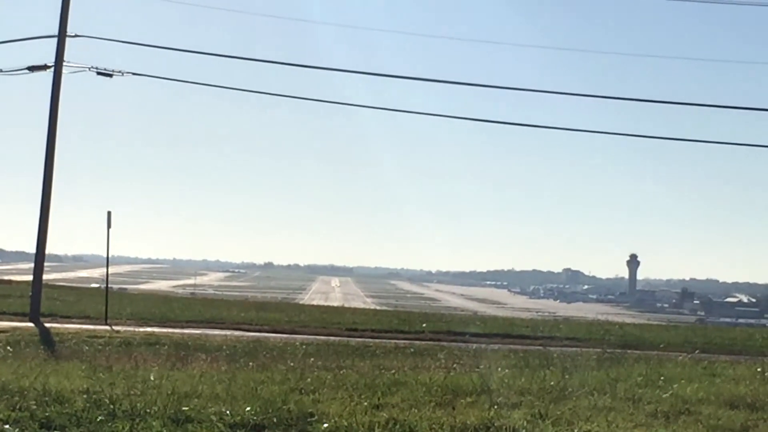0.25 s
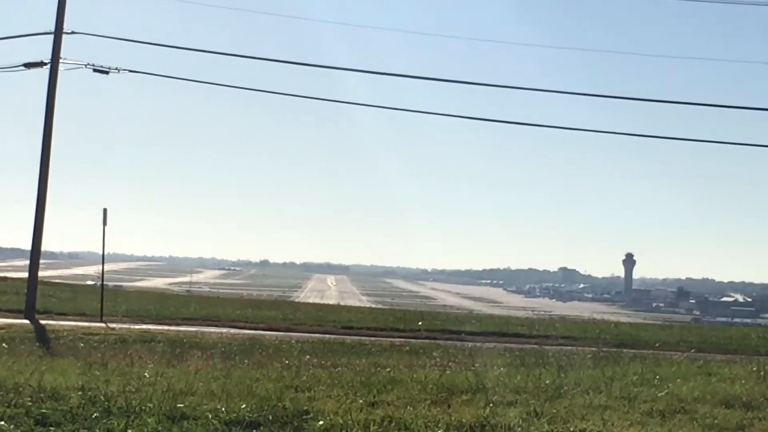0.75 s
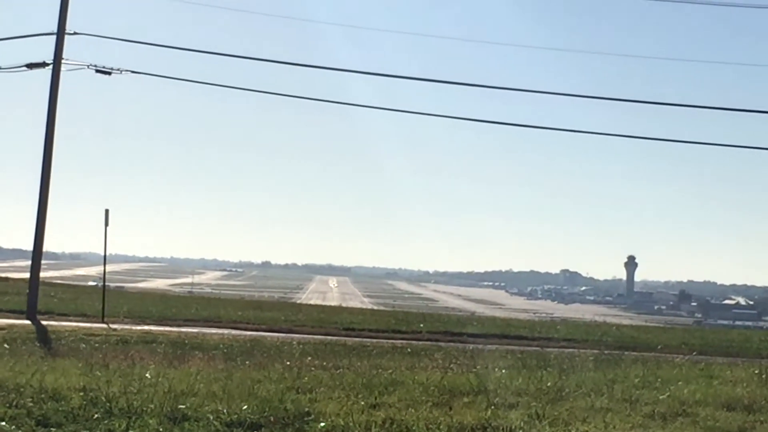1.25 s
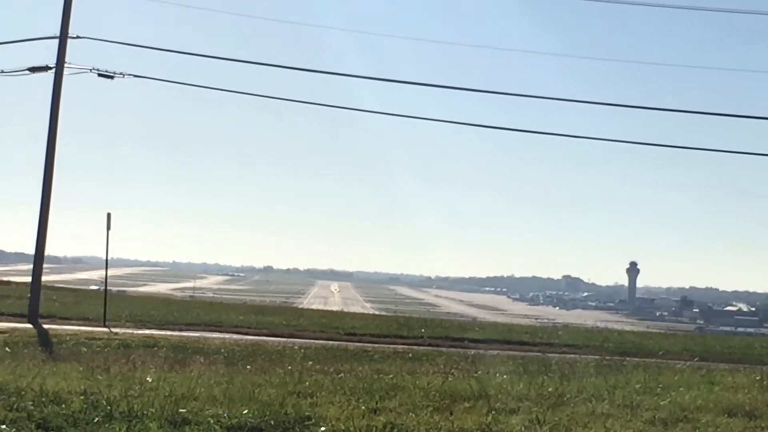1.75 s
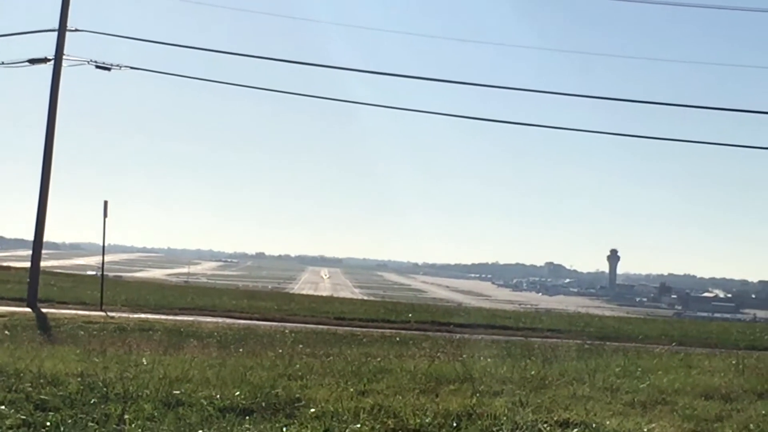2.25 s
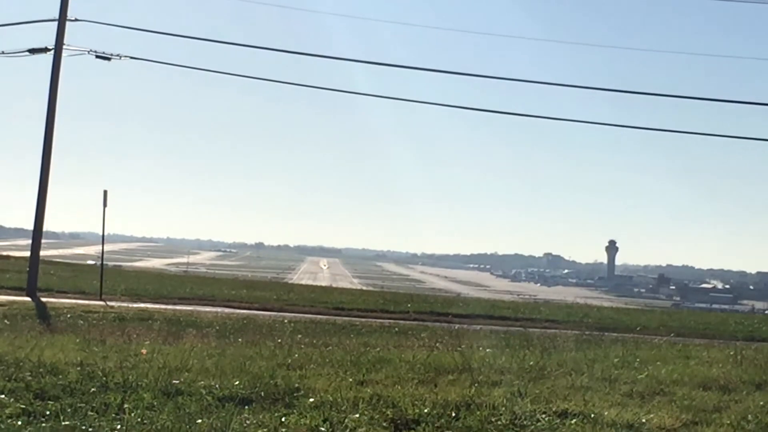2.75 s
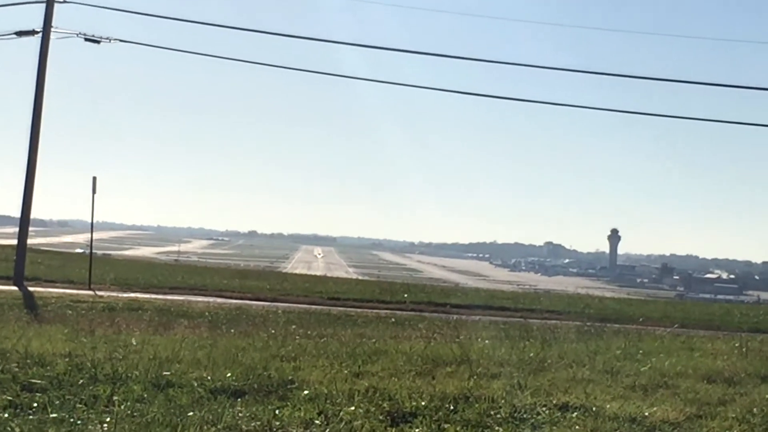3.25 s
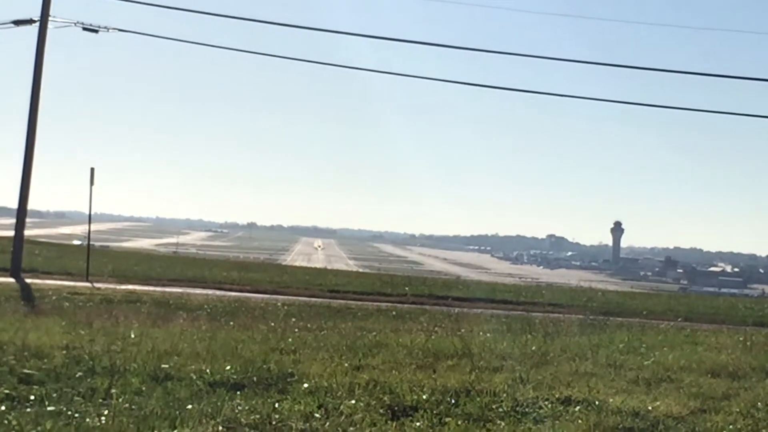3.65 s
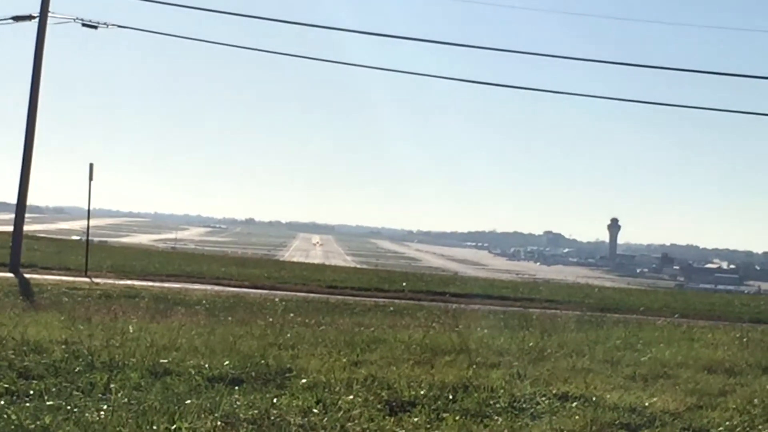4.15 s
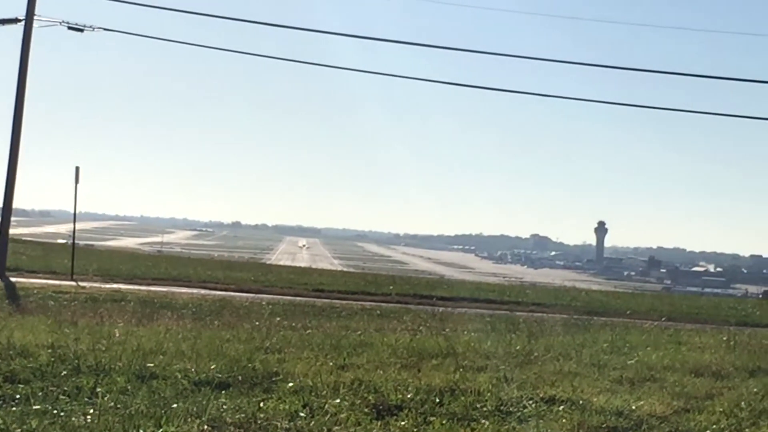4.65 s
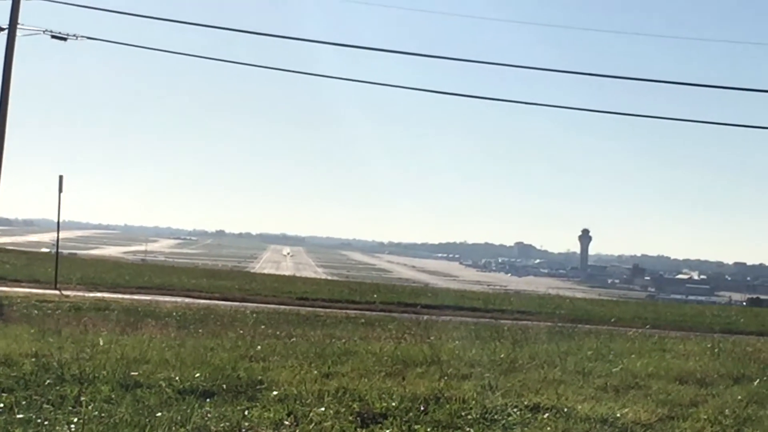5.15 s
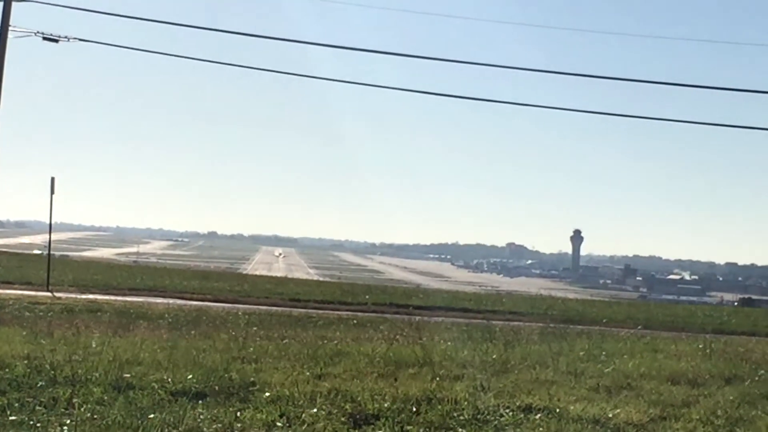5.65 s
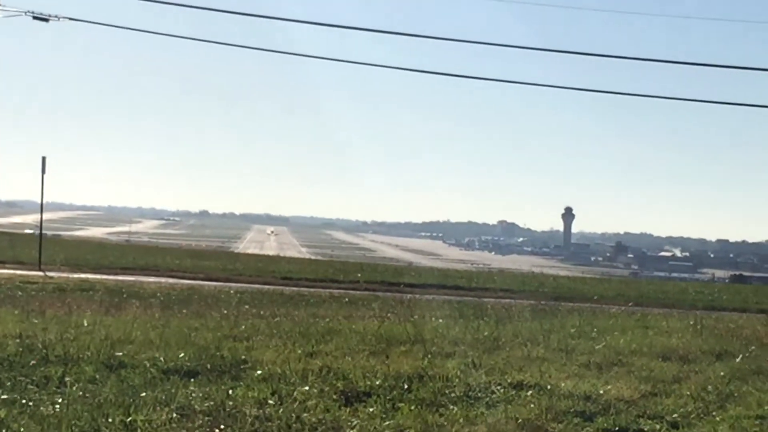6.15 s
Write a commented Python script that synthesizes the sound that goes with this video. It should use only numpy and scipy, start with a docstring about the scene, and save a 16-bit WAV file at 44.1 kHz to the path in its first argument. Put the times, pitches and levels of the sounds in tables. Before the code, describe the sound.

A distant jet airliner rumbles and roars steadily while crickets chirp in the grass and small birds call.

```python
"""A meadow beyond the runway, on the microphone of a hand-held camera, with a jet airliner far off.
From the start, its exhaust rumbles and roars at takeoff power under faint turbine whines, and crickets
scrape their wings in the grass. The camera ticks, mostly in the first 1.5 s, as small birds begin to
chip and pipe. The nearest cricket grows loudest around 3.5 s. From 4.7 s a songbird whistles one
phrase three times, while the roar goes on sinking slowly as the jet draws away."""
import sys
import numpy as np
from scipy import signal
from scipy.fft import rfft, irfft, next_fast_len
from scipy.io import wavfile
from scipy.ndimage import uniform_filter1d, map_coordinates

SR = 44100
rng = np.random.default_rng(int(sys.argv[2]) if len(sys.argv) > 2 else 0)


def wav_record(signal):
    """Record a signal, one row per channel, as 16-bit PCM in the file named by sys.argv[1]."""
    frames = np.transpose(np.atleast_2d(signal))
    bounded = np.clip(frames, -1, 1)
    # unit amplitude maps onto the largest positive 16-bit level
    quanta = np.round(bounded * 32767).astype(np.int16)
    wavfile.write(sys.argv[1], SR, quanta)


N = 282240

# spectra of the exhaust's rumble and roar at the microphone: f/Hz, relative level/dB
RUMBLE_SPECTRUM = [(20, -43), (32, -23.5), (48, -10), (65, -1.5), (86, -0.5), (120, -2.5), (150, -10.5),
                   (210, -15), (320, -24.5), (600, -53), (1500, -79)]
ROAR_SPECTRUM = [(100, -19), (250, -4), (350, 0.5), (440, -2.5), (560, 3), (700, 2), (950, -2.5),
                 (1200, -10), (1600, -18.5), (2200, -28), (3500, -50), (8000, -77)]
# the jet rumble's uneven, random rises and dips in loudness: t/s, level/dB
RUMBLE_LOUDNESS = [(0, -44.5), (.14, -35.5), (.24, -44.5), (.32, -37), (.53, -38), (.73, -43.5),
                   (.84, -42.5), (1.0, -40.5), (1.11, -45), (1.25, -42), (1.37, -40.5), (1.53, -43),
                   (1.74, -41), (2.05, -46), (2.2, -42), (2.56, -45), (2.74, -41.5), (2.85, -42.5),
                   (2.97, -38), (3.15, -46), (3.3, -42.5), (3.54, -41), (3.76, -41.5), (4.02, -43),
                   (4.26, -43), (4.42, -39.5), (4.58, -45), (4.8, -42.5), (5.09, -43.5), (5.24, -40.5),
                   (5.4, -42.5), (5.52, -42.5), (5.73, -44), (5.89, -38.3), (6.13, -42.5), (6.4, -42.5)]
# the roar's low band against the rest of the roar: t/s, level/dB
LOW_ROAR_SWELLS = [(0, 2), (.9, 1.5), (1.25, 3), (1.95, -1), (2.5, 2.5), (3.7, 0), (4.15, 1.5), (4.4, 6),
                   (5.1, -1), (5.85, -0.5), (6.4, -4.5)]
# the lower engine tone: t/s, level/dB
LOW_TONE_SWELLS = [(0, -60.5), (1.5, -70), (2.3, -72), (2.9, -58), (3.4, -66), (4.8, -75), (5.45, -54.5),
                   (5.8, -58), (6.05, -59), (6.4, -58)]
# the rising fan whine: t/s, f/Hz, level/dB
FAN_WHINE = [(0, 1298, -71.5), (2.4, 1389, -74.5), (3.35, 1432, -69.5), (3.8, 1480, -80.5),
             (6.4, 1658, -76)]

# short notes opening each songbird phrase:
# t/s, length/s, first f/Hz, middle f/Hz, last f/Hz, quaver/share of pitch, level/dB
OPENING_NOTES = [(4.74, 0.032, 4060, 4380, 4500, .035, -75.5),
                 (4.785, 0.034, 2890, 2980, 2950, 0.019, -61.5),
                 (4.837, 0.013, 3190, 3300, 3180, .03, -62.5), (4.879, 0.014, 2650, 2560, 2310, .012, -60),
                 (4.964, 0.025, 3640, 3800, 3600, .018, -63),
                 (5.214, 0.035, 4000, 4200, 4370, 0.047, -69.5),
                 (5.263, 0.042, 2890, 2936, 2940, 0.022, -63),
                 (5.312, 0.016, 3450, 3260, 3220, .035, -60.5),
                 (5.359, 0.014, 2800, 2550, 2200, .012, -59.5),
                 (5.438, 0.035, 3600, 3800, 3710, .018, -62.5),
                 (5.685, 0.0445, 4040, 4280, 4450, 0.027, -71.5),
                 (5.736, 0.085, 2940, 3020, 3080, .035, -69),
                 (5.777, 0.047, 3440, 3320, 3210, 0.041, -67.5),
                 (5.834, 0.018, 2750, 2500, 2150, .012, -63), (5.913, 0.042, 3600, 3754, 3660, 0.014, -62)]
# the falling whistle closing each phrase, one curve each: t/s, f/Hz, level/dB
CLOSING_SLURS = [
    [(5.003, 2920, -60), (5.013, 2830, -52), (5.039, 2654, -52.5), (5.075, 2610, -57), (5.091, 2580, -58),
     (5.097, 2540, -70), (5.105, 2550, -56), (5.114, 2490, -68)],
    [(5.482, 2870, -61), (5.492, 2850, -58), (5.503, 2790, -53), (5.519, 2635, -52.5), (5.545, 2630, -56),
     (5.563, 2540, -56), (5.573, 2480, -65), (5.58, 2500, -70)],
    [(5.959, 2900, -64), (5.968, 2785, -52.5), (5.987, 2670, -56), (6.012, 2653, -58), (6.026, 2608, -63),
     (6.048, 2530, -59), (6.059, 2470, -65)],
]
# soft piping of small birds: t/s, length/s, f/Hz, drop/share of pitch, level/dB
PIPING_NOTES = [(1.374, 0.025, 4270, 0.037, -70), (1.459, 0.024, 4300, .08, -65),
                (1.548, .026, 4270, .06, -68.5), (2.0, .016, 4600, .01, -84), (2.145, .016, 4620, .01, -83),
                (3.23, .016, 4560, .01, -83.5), (3.325, .016, 4560, .04, -81), (4.17, .018, 4630, .01, -79),
                (4.273, .021, 4290, .01, -72), (4.346, .021, 4300, .01, -68.5),
                (4.423, 0.03, 4300, 0.046, -66), (6.26, 0.025, 4640, .02, -75),
                (6.313, .022, 4650, .02, -70)]
# sharp alarm chips: t/s, starting f/Hz, level/dB
ALARM_CHIPS = [(0.212, 5050, -70), (.658, 5650, -73), (0.7748, 4530, -66.5), (2.844, 4700, -69.5),
               (4.258, 4330, -66.5), (5.322, 4600, -65.5), (6.366, 4470, -66)]
# birds further off, blurred by echoes: t/s, f/Hz, level/dB
FAR_BIRD_NOTES = [(0.86, 3590, -82.5), (0.907, 3010, -78), (0.925, 6250, -82), (1.047, 3640, -81.5),
                  (1.134, 2780, -81.5)]

# the cricket nearest the microphone: t/s, length/s, f/Hz, level/dB
NEAR_CRICKET = [(.198, 0.051, 8300, -75), (.428, .04, 8350, -75), (.657, 0.054, 8420, -71.5),
                (0.889, 0.053, 8380, -69.5), (1.132, 0.066, 8370, -69), (1.359, .056, 8400, -68.5),
                (1.592, 0.046, 8400, -68), (1.802, 0.056, 8400, -64.5), (2.06, 0.059, 8420, -65),
                (2.292, 0.057, 8470, -65.5), (2.55, .064, 8300, -66), (2.755, 0.067, 8360, -64),
                (3.025, 0.07, 8370, -63), (3.253, .064, 8330, -62), (3.455, 0.062, 8410, -59),
                (3.69, 0.074, 8370, -60.5), (3.923, 0.065, 8440, -61.5), (4.168, 0.06, 8420, -63.5),
                (4.395, 0.062, 8430, -64), (4.681, 0.059, 8400, -65.5), (4.902, 0.061, 8340, -62.5),
                (5.139, 0.066, 8380, -64)]
# a slower cricket further off: t/s, level/dB
SLOW_CRICKET = [(0, -71.5), (.282, -72), (.513, -71.5), (.749, -71), (1.021, -72), (1.292, -73),
                (1.54, -71), (1.814, -72), (2.075, -73), (2.33, -74), (2.591, -74), (2.855, -74.5),
                (3.095, -75), (3.325, -75), (3.555, -73), (3.82, -74), (4.075, -72), (4.301, -72.5),
                (4.53, -75.5), (4.753, -72.5), (5.008, -76), (5.265, -74.5), (5.528, -72.5), (5.778, -72),
                (6.047, -72.5), (6.274, -74.5)]
# choirs of distant crickets: f/Hz, level of one insect/dB
FAR_CHOIRS = [(6800, -84), (7180, -84), (7800, -85)]
# insect hiss across the meadow: f/Hz, relative level/dB
HISS_SPECTRUM = [(1200, -10.5), (2000, -4), (2900, -3.5), (4400, -5.5), (5000, -8.5), (6000, -6.5),
                 (6750, -4), (7600, -5.5), (8300, -5), (9100, -8.5), (10300, -15.5), (11500, -13.5),
                 (15200, -18)]
# ticks of the camera body, right at the microphone: t/s, level/dB, ring f/Hz
CAMERA_TICKS = [(0.414, -54, 4600), (0.4153, -50, 5800), (0.4157, -48, 1890), (0.4207, -36, 2015),
                (.4309, -51, 3600), (.4358, -47, 1870), (1.229, -54, 2410), (1.385, -51, 2290),
                (1.504, -56, 2620), (3.981, -59, 3300), (5.012, -53, 3960), (6.016, -52, 3900)]

WAVER_PER_S, WAVER_SHARE, WAVER_DB = 66, 0.0087, 2  # unsteadiness of a bird's pitch and loudness


def exhaust():
    """Big eddies rumble and small ones roar, uneven in loudness; distance has taken the treble."""
    rumble_db, = curves(RUMBLE_LOUDNESS)
    low_db, = curves(LOW_ROAR_SWELLS)
    roar_db = -49.5 - 0.35 * np.arange(N) / SR  # sinks as the jet draws away
    flutter = amp(1.03 * wobble(21.986))
    rumble = amp(rumble_db) * steadied(flutter * rush(RUMBLE_SPECTRUM, patchy_db=0.2))
    roar = amp(roar_db + 0.46 * wobble(9)) * steadied(rush(ROAR_SPECTRUM, patchy_db=2.13))
    low_band = filtered(roar, lambda hz: np.exp(-((hz - 315) / 95) ** 2))
    return rumble + roar + (amp(low_db) - 1) * low_band


def turbines():
    """From the meadow, two engine tones and a slowly rising fan whine barely clear the roar."""
    low_db, = curves(LOW_TONE_SWELLS)
    high_db = -63.5 - np.arange(N) / SR  # fades 1 dB a second
    whine_hz, whine_db = curves(FAN_WHINE)
    tones = amp(low_db) * far_tone(542, width_hz=19) + amp(high_db) * far_tone(802, width_hz=8)
    return tones + amp(whine_db) * far_tone(whine_hz, width_hz=55)


def far_tone(hz, width_hz):
    """A tone whose level and phase are scrambled by a long path through moving air."""
    phase = 2 * np.pi * np.cumsum(hz * np.ones(N)) / SR
    return unit(wobble(width_hz) * np.cos(phase) + wobble(width_hz) * np.sin(phase))


def songbird():
    """Three phrases ring across the meadow, each a few short notes and a falling whistle."""
    notes, slurs = np.zeros((2, N))
    for s, *shape, db in OPENING_NOTES:
        add(notes, s, amp(db) * whistle(*shape, softness=0.17))
    for points in CLOSING_SLURS:
        add(slurs, points[0][0], slur(points))
    return outdoors(notes, t60=0.31, wet_db=-4.5) + outdoors(slurs, t60=0.43, wet_db=-14)


def whistle(length, first_hz, middle_hz, last_hz, quaver, softness):
    """One bird note: a wavering tone arcs through three pitches with a fast random quaver."""
    u = np.linspace(0, 1, max(int(length * SR), 64))
    arc = np.polyval(np.polyfit([0, 0.5, 1], [first_hz, middle_hz, last_hz], 2), u)
    flutter = smooth_noise(len(u), width=40)
    knot_position = u * length * WAVER_PER_S
    bend, effort = (map_coordinates(knots, [knot_position]) for knots in rng.standard_normal((2, 16)))
    phase = 2 * np.pi * np.cumsum(arc * (1 + quaver * flutter + WAVER_SHARE * bend)) / SR
    envelope = np.abs(np.sin(np.pi * u)) ** softness * amp(WAVER_DB * effort)
    return unit(envelope * np.sin(phase))


def slur(points, quaver=0.008, edge_s=0.0033):
    """The songbird's long whistle trembles along a curve of pitch and level."""
    s, hz, db = np.transpose(points)
    t = np.arange(s[0], s[-1], 1 / SR)
    pitch = np.interp(t, s, hz) * (1 + quaver * smooth_noise(len(t), width=40))
    phase = 2 * np.pi * np.cumsum(pitch) / SR
    edges = np.clip(np.minimum(t - t[0], t[-1] - t) / edge_s, 0, 1)
    tremble_db = WAVER_DB * wobble(WAVER_PER_S)[:len(t)]
    return edges * amp(np.interp(t, s, db)) * unit(amp(tremble_db) * np.sin(phase))


def small_birds(pipe_arch=0.0052, far_fall=0.048):
    """Piping and alarm chips around the meadow; the farthest notes arrive mostly as echo."""
    pipes, chips, far = np.zeros((3, N))
    for s, length, hz, drop, db in PIPING_NOTES:
        pitches = hz * (1 + drop / 2), hz * (1 + pipe_arch), hz * (1 - drop / 2)
        add(pipes, s, amp(db) * whistle(length, *pitches, quaver=0.0069, softness=0.9))
    for s, hz, db in ALARM_CHIPS:
        add(chips, s, amp(db) * chip(hz))
    for s, hz, db in FAR_BIRD_NOTES:
        pitches = hz * (1 + far_fall), hz, hz * (1 - far_fall)
        add(far, s, amp(db) * whistle(0.046, *pitches, quaver=0.048, softness=0.6))
    nearer = outdoors(pipes, t60=0.11, wet_db=-8.5) + outdoors(chips, t60=0.14, wet_db=-4.5)
    return nearer + outdoors(far, t60=0.11, wet_db=5.5)


def chip(start_hz, top_hz=7200, rise_s=0.0075, attack_s=0.00076, decay_s=0.0061):
    """A thin, raspy call that sweeps up fast and levels off as it dies."""
    t = np.arange(SR // 40) / SR
    hz = top_hz + (start_hz - top_hz) * np.exp(-t / rise_s)
    rasp = 0.051 * smooth_noise(len(t), width=30)
    envelope = (1 - np.exp(-t / attack_s)) * np.exp(-t / decay_s)
    return unit(envelope * np.sin(2 * np.pi * np.cumsum(hz * (1 + rasp)) / SR))


def lone_crickets(near_strokes_per_s=125.5):
    """Three crickets keep their own beats in the grass: one near, one further off, one far and high."""
    track = np.zeros(N)
    for s, length, hz, db in NEAR_CRICKET:
        voice = chirp(hz, near_strokes_per_s, duty=0.68, droop=0.031, rasp=0.012,
                      upper_db=-25, snag_db=-12, count=round(length * near_strokes_per_s))
        add(track, s, amp(db) * voice)
    for s, db in SLOW_CRICKET:
        voice = chirp(hz=8380, stroke_rate=104.3, duty=0.674, droop=0.0336, rasp=0.011, tiring=0.0187)
        add(track, s, amp(db) * voice)
    for s in np.arange(0.135, N / SR, 0.2635):
        voice = chirp(hz=8800, stroke_rate=125, duty=0.85, droop=0.012, rasp=0.01, count=6)
        add(track, s + rng.normal(0, 0.01), amp(rng.normal(-79.5, 1.5)) * voice)
    return outdoors(track, t60=0.064, wet_db=-21)


def chirp(hz, stroke_rate, duty, droop, rasp, tiring=0, upper_db=-60, snag_db=-60, count=8):
    """A run of wing strokes; in each the scraper slows along the file, so the pitch droops."""
    position = np.arange(int(count * SR / stroke_rate)) * stroke_rate / SR
    stroke = position.astype(int)
    u = np.clip(position % 1 / duty, 0, 1)  # progress through the stroke
    build_up = np.minimum((stroke + 1) / 2.81, 1)
    force = build_up * amp(rng.normal(0, 1.64, count))[stroke]
    teeth = smooth_noise(len(u), width=24)  # uneven teeth of the file
    weak_bend = 0.0306 * (np.minimum(force, 1) - 1)  # weak strokes sound flat
    pitch = hz * (1 + droop * (0.5 - u) - tiring * position / count + weak_bend + rasp * teeth)
    phase = 2 * np.pi * np.cumsum(pitch) / SR
    wing = np.sin(phase) + amp(upper_db) * np.sin(1.47 * phase)  # with a weak upper mode
    since_snag = u - rng.uniform(0.2, 0.59, count)[stroke]  # the scraper catches once a stroke
    snag_decay = (since_snag > 0) * np.exp(-9 * np.abs(since_snag))
    snag = snag_decay * rng.rayleigh(1, count)[stroke] * rng.standard_normal(len(u))
    return unit(force * np.abs(np.sin(np.pi * u)) ** 0.44 * (wing + amp(snag_db) * snag))


def far_insects():
    """Distant crickets, three to a choir and each on its own beat, blur into the meadow's hiss."""
    chorus = np.zeros(N)
    for hz, db in FAR_CHOIRS:
        for offset, pace in rng.random(size=(3, 2)):
            period_s = 0.26 * (1 + 0.3 * (pace - 0.5))
            for s in (offset + np.arange(28)) * period_s:
                pitch = hz * rng.normal(1, 0.016)
                voice = chirp(pitch, rng.uniform(100, 135), duty=0.836, droop=0.027, rasp=0.028)
                add(chorus, s + rng.normal(0, 0.016), amp(db + rng.normal(0, 2.4)) * voice)
    hiss = amp(-73 + 0.19 * wobble(3.9)) * rush(HISS_SPECTRUM, patchy_db=1.5)
    return outdoors(chorus, t60=0.093, wet_db=-1.5) + hiss


def camera_ticks(ring_cycles=15.2):
    """Handling noise at the microphone: each tiny crack rings two modes of the casing."""
    track, t = np.zeros(N), np.arange(SR // 40) / SR
    for s, db, hz in CAMERA_TICKS:
        phase = 2 * np.pi * hz * t
        modes = np.sin(phase) + amp(-6.5) * np.sin(1.44 * phase)
        ring = modes * amp(-60 * t * hz / ring_cycles)
        crack = 0.16 * smooth_noise(len(t), width=3) * amp(-60 * t / 0.0054)
        add(track, s, amp(db) * (ring + crack))
    return outdoors(track, t60=0.12, wet_db=-9)


def outdoors(x, t60, wet_db):
    """Grass, poles and trees scatter a thin tail that falls 60 dB in t60 seconds."""
    t = np.arange(SR // 2) / SR
    tail = rng.standard_normal(len(t)) * amp(-60 * t / t60)
    return x + amp(wet_db) * signal.fftconvolve(x, tail / np.linalg.norm(tail))[:N]


def rush(spectrum, patchy_db):
    """Coloured noise of rms 1 with drifting patches of random gain."""
    bins = signal.stft(rng.standard_normal(N), nperseg=1024)[2]
    patches = uniform_filter1d(rng.standard_normal(bins.shape), size=5, axis=0)
    patches = uniform_filter1d(patches, size=14, axis=1)
    noise = signal.istft(bins * amp(patchy_db * unit(patches)), nperseg=1024)[1][:N]
    f, db = np.transpose(spectrum)
    return unit(filtered(noise, lambda hz: amp(np.interp(np.log(hz + 1), np.log(f), db))))


def steadied(x):
    """Even out slow swells, holding the rms near 1."""
    return x / np.sqrt(np.abs(uniform_filter1d(x ** 2, size=SR // 5)) + 1e-12)


def smooth_noise(count, width):
    """Noise of rms 1, averaged over width samples."""
    return unit(uniform_filter1d(rng.standard_normal(count), size=width))


def wobble(rate):
    """A smooth random curve, rate knots a second."""
    return map_coordinates(rng.standard_normal(int(N * rate / SR) + 4), [np.arange(N) * rate / SR])


def curves(rows):
    """One value per sample for each column after the time."""
    s, *cols = np.transpose(rows)
    return [np.interp(np.arange(N) / SR, s, c) for c in cols]


def filtered(x, response):
    """Shape x by a gain that depends on frequency."""
    size = next_fast_len(N + SR // 2)
    return irfft(rfft(x, size) * response(np.fft.rfftfreq(size, 1 / SR)), size)[:N]


def add(track, s, sound):
    """Mix a sound into a track at time s."""
    start = int(np.clip(round(s * SR), 0, N))
    track[start:start + len(sound)] += sound[:N - start]


def amp(db):
    """Decibels to gain."""
    return 10 ** (np.asarray(db) / 20)


def unit(x):
    """Scale to rms 1."""
    return x / np.sqrt(np.mean(x ** 2) + 1e-20)


def scene():
    """The jet far off and the meadow close by, on one microphone."""
    jet = exhaust() + turbines()
    meadow = songbird() + small_birds() + lone_crickets() + far_insects()
    return (jet + meadow + camera_ticks())[None]


def record(dry):
    """The camera keeps nothing above its band limit."""
    return np.array([filtered(channel, lambda hz: hz < 15250) for channel in dry])


dry = scene()
out = record(dry)
wav_record(out)
```